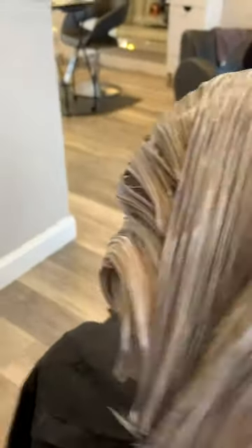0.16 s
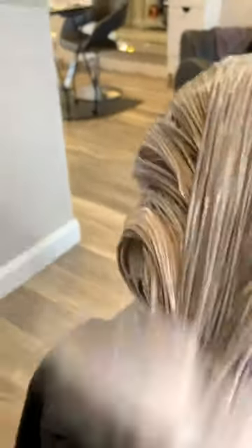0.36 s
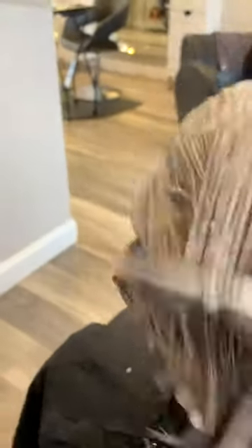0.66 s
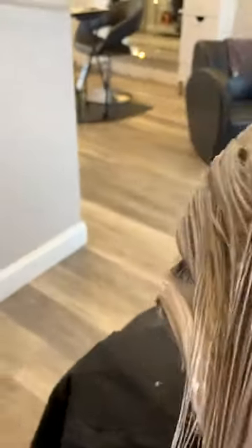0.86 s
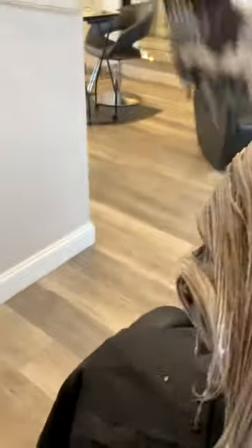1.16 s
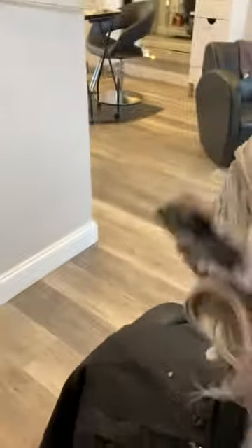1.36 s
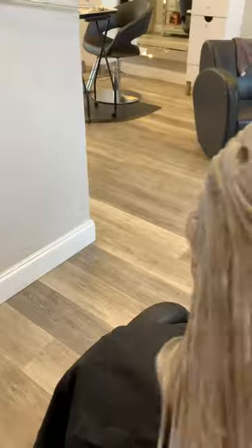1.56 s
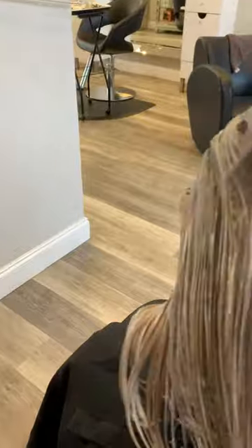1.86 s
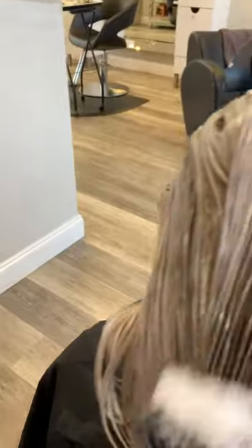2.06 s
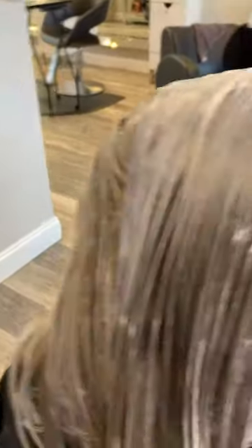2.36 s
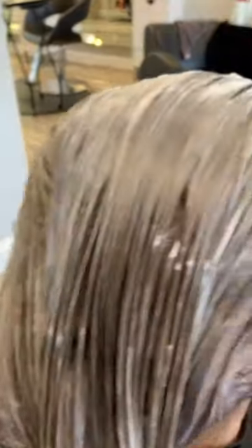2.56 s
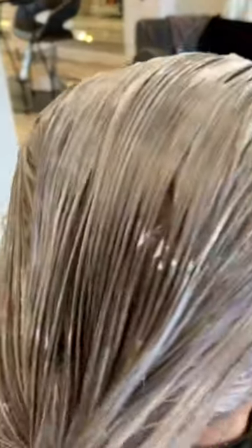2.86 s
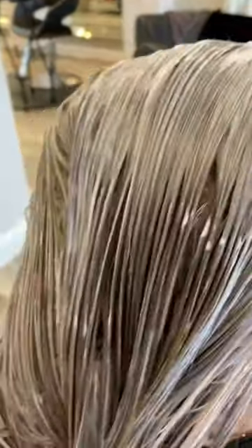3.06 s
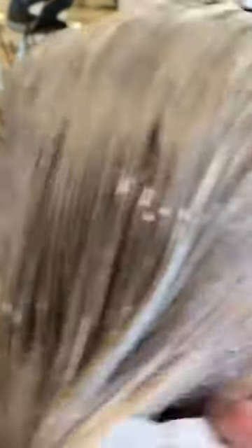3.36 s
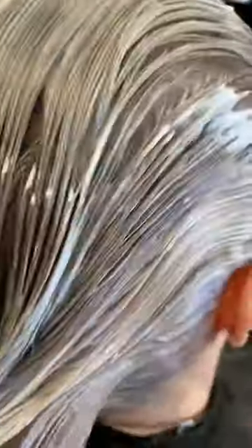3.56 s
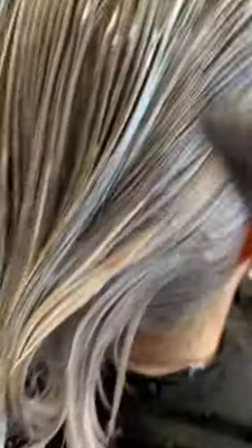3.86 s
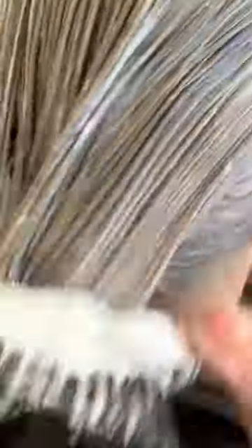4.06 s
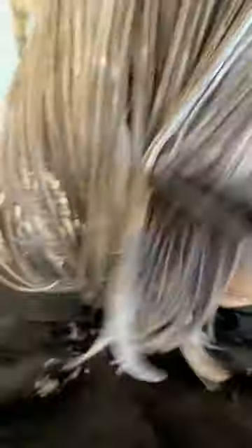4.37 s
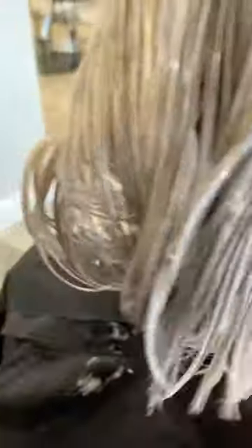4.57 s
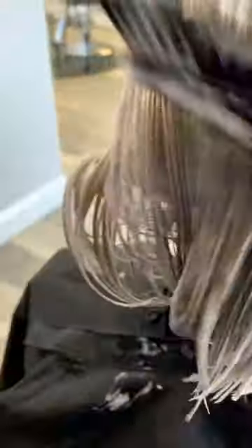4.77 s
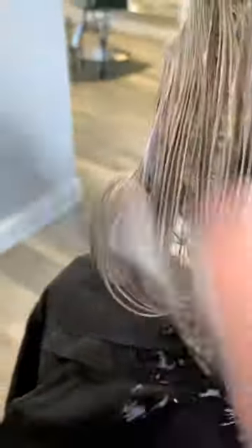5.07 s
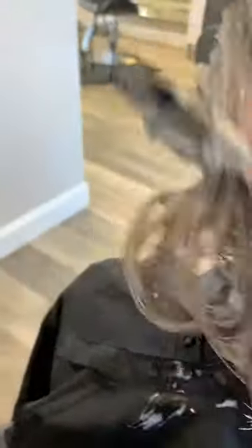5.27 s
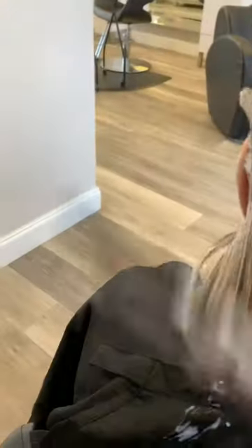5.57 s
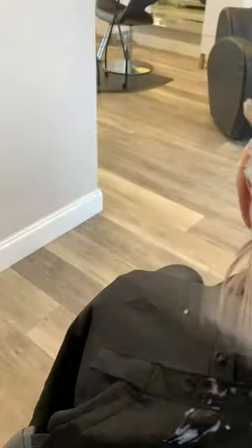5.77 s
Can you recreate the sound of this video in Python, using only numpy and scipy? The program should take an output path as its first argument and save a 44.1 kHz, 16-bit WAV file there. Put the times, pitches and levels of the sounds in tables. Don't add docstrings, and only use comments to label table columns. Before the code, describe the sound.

A brush works through wet hair right beside a phone's stereo microphone in a quiet salon. Each stroke is a dense, bright hiss of bristles with a duller scalp rasp, swelling slightly and ending quickly. Strokes land at about 0, 0.6, 1.3, 2.0, 2.6, 3.2, 3.5, 3.9, 4.4, 4.5, 4.8, 5.3 and 5.7 seconds, mostly 0.1 to 0.3 seconds long, with faint grazes trailing off the tips. Hard plastic ticks stand out near 1.1, 2.0, 2.6, 5.1 and 5.7 seconds, among fainter clicks and wet strand snaps. A small distant chair squeak comes at 0.2 seconds, soft low bumps at 0.5 to 0.8, light knocks around 2.2, and very faint cape creaks near 0.5, 2.2 and 3.8. Underneath, ventilation rumbles softly with a wavering low hum and slight puffs of air. The room adds only a short, faint tail; the stereo image shifts subtly as the brush passes.

```python
import sys
import numpy as np
from scipy import signal
from scipy.fft import rfft, irfft, next_fast_len
from scipy.io import wavfile
from scipy.ndimage import uniform_filter1d, map_coordinates

SR = 44100
rng = np.random.default_rng(int(sys.argv[2]) if len(sys.argv) > 2 else 0)


def ratio_of_db(decibels):
    return 10 ** (np.asarray(decibels, float) / 20)


def pcm_store(signal):
    levels = np.round(np.clip(np.atleast_2d(signal), -1, 1) * 32767)
    wavfile.write(sys.argv[1], SR, levels.astype(np.int16).T)


N = 261513
STEP = 20
SHARED = [
    [1],
    [0],
]


def unit(x):
    return x / np.sqrt(np.mean(x ** 2) + 1e-20)


def along(points, hz):
    f, v = np.transpose(points)
    return np.interp(np.log(hz + 1), np.log(f + 1), v)


def curves(rows, outside=None):
    s, *cols = np.transpose(rows)
    return np.array([np.interp(np.arange(N) / SR, s, c, outside, outside) for c in cols])


def slow_time():
    return np.arange(0, N + STEP, STEP) / SR


def smooth(control):
    return np.interp(np.arange(N) / STEP, np.arange(len(control)), control)


def wobble(rate_hz):
    knots = rng.standard_normal(int(N * rate_hz / SR) + 4)
    return map_coordinates(knots, [np.arange(N) * rate_hz / SR])


def filtered(x, response):
    m = next_fast_len(N + SR // 2)
    return irfft(rfft(x, m) * response(np.fft.rfftfreq(m, 1 / SR)), m)[..., :N]


def resonance(f, centre_hz, width_hz):
    return 1j * f * width_hz / (centre_hz ** 2 - f * f + 1j * f * width_hz)


def rush(spectrum, patchy_db, grain_db=0):
    z = signal.stft(rng.standard_normal((2, N)), nperseg=512)[2]
    field = uniform_filter1d(rng.standard_normal(z.shape[1:]), 6, 0)
    field = uniform_filter1d(field, 8, 1)
    pair = signal.istft(z * ratio_of_db(patchy_db * unit(field)), nperseg=512)[1][:, :N]
    pair = pair * ratio_of_db(grain_db * wobble(900))
    return unit(filtered(pair, lambda hz: ratio_of_db(along(spectrum, hz))))


def contact(start_s, end_s, start_db, end_db, fall_db_per_s):
    t = slow_time()
    landing_db = 3000 * np.maximum(start_s - t, 0)
    fall_db = fall_db_per_s * np.maximum(t - end_s, 0)
    return np.interp(t, [start_s, end_s], [start_db, end_db]) - landing_db - fall_db


def reach():
    return curves([(s, k % 2) for row in STROKES for k, s in enumerate(row[:3])])[0]


def passing(t):
    ends = []
    for k, row in enumerate(STROKES):
        ends += [(row[0], k), (row[2], k + 1)]
    return abs(np.sin(np.pi * np.interp(t, *np.transpose(ends))))


# frequency in Hz, level in dB per Hz.
RUMBLE = [(10, 1), (20, 5), (35, 6.5), (50, 2.5), (75, -8), (110, -48.5)]
DRONE = [(45, -29.5), (75, 0.5), (100, -4.5), (150, -9), (230, -9), (320, -23.5), (500, -54)]
DUCT = [(180, -5.5), (270, 1), (345, 2), (420, -4.5), (520, -15), (700, -16.5), (1000, -55)]
HUSH = [(500, -0.5), (1000, 0.5), (2200, -7.5), (2700, -5), (5000, -15.5), (8000, -27), (12500, -31),
        (15000, -27), (15700, -45)]
# frequency in Hz, level in dB.
HUM = (240, -59.5)
# time in seconds, level in dB.
FAN = [(0.0, -61), (0.08, -51), (0.54, -50), (0.63, -57), (0.66, -54), (1.55, -48.5), (2.16, -56),
       (2.82, -46.5), (3.35, -59), (3.47, -52), (4.39, -49.5), (4.44, -55), (5.1, -49.5), (5.3, -55),
       (5.33, -49), (5.93, -50)]
# peak in seconds, level in dB.
PUFFS = [(.12, -68.5), (.56, -60), (.79, -61.5), (1.09, -66), (1.75, -68), (2.21, -66.5), (2.97, -64),
         (3.52, -62), (3.86, -60.5), (4.62, -68.5), (5.19, -65.5), (5.61, -63.5), (5.93, -67)]


def ventilation():
    t = np.arange(N) / SR
    rumble_db = -58.5 + 3.5 * reach() + 2.5 * wobble(2.5)
    drone_db = -60.5 + 1.2 * wobble(6.8)
    colours = lambda hz: ratio_of_db([[along(RUMBLE, hz)], [along(DRONE, hz)]])
    rumble, drone = map(unit, filtered(rng.standard_normal((2, 2, N)), colours))
    fan_db = curves(FAN)[0] + 3.5 + 1.0 * wobble(9)
    fan = ratio_of_db(fan_db) * np.sin(2 * np.pi * 58.5 * t + 0.79 * wobble(8))
    hum_hz, hum_db = HUM
    hum = ratio_of_db(hum_db + 4.5 + 1.4 * wobble(9.2)) * np.sin(2 * np.pi * hum_hz * t + 0.25 * wobble(11))
    puff_db_per_s, duct_floor_db = 51, -73
    puffs_db = np.max([db - puff_db_per_s * abs(slow_time() - s) for s, db in PUFFS], 0)
    duct_db = smooth(puffs_db.clip(duct_floor_db))
    duct = ratio_of_db(duct_db + 2.0) * rush(DUCT, patchy_db=3.0)
    hush = ratio_of_db(-78.5 + 1.0 * wobble(13)) * rush(HUSH, patchy_db=3.0)
    turbulence = ratio_of_db(rumble_db + 6.0) * rumble + ratio_of_db(drone_db + 2.0) * drone
    return turbulence + (fan + hum) * SHARED + duct + hush


# time in seconds, frequency in Hz, level in dB, length in seconds.
THUMPS = [
    (.507, 95, -38, 0.0075),
    (0.652, 32, -38.5, 0.028),
    (0.758, 70, -41, 0.0063),
    (2.19, 351, -53, .02),
    (2.27, 339, -62.5, .04),
    (0.556, 330, -55, 0.011),
]


def thumps():
    t = slow_time()
    total = 0
    for s, hz, db, length_s in THUMPS:
        bell = np.exp(-((t - s) / length_s) ** 2)
        total = total - ratio_of_db(db) * bell * np.cos(2 * np.pi * hz * (t - s))
    return smooth(total)


# start in seconds, end in seconds, start level in dB, end level in dB.
CREAKS = [
    (0.398, 0.597, -89, -74),
    (2.2, 2.296, -82, -83),
    (3.714, 3.93, -92, -78),
]


def creak():
    rubs = ratio_of_db(1.7 * wobble(65)) * rng.standard_normal((2, N))
    cloth = unit(filtered(rubs, lambda f: resonance(f, 2170, 260) ** 2))
    level = sum(ratio_of_db(contact(*row, fall_db_per_s=150)) for row in CREAKS)
    return smooth(level) * cloth


# time in seconds, level in dB.
SQUEAK = [
    (.18, -92),
    (.19, -49.5),
    (.26, -62),
    (.4, -76.5),
    (.415, -90),
    (.435, -76),
    (.5, -91),
]


def squeak():
    slip_rate_hz = 125 * ratio_of_db(.7 * wobble(30))
    slips = np.diff(np.floor(np.cumsum(slip_rate_hz / SR)), prepend=0) * ratio_of_db(1.5 * wobble(100))
    steel = unit(filtered(slips, lambda f: resonance(f, 3170, 130) ** 2))
    tone = ratio_of_db(curves(SQUEAK, outside=-150)[0]) * steel
    return np.array([tone, np.roll(tone, 4)])


# frequency in Hz, t60 in seconds.
WALLS = [(300, 0.26), (2000, 0.12), (10000, 0.041)]


def walls(x):
    hz, t, z = signal.stft(rng.standard_normal((2, SR // 2)), SR, nperseg=256)
    decay = ratio_of_db(-60 * t / along(WALLS, hz)[:, None])
    tail = signal.istft(z * decay, SR, nperseg=256)[1]
    delayed = np.pad(x, (150, 0))[None]
    return signal.fftconvolve(delayed, tail / np.linalg.norm(tail[0]), axes=1)[:, :N]


# time in seconds, peak in dB, knock in dB re peak.
TICKS = [(0.4356, -70, -14), (0.6005, -55, -18), (0.9469, -50, -22), (1.002, -60, 3), (1.0872, -31, 0),
         (1.2627, -65, -13), (1.861, -66, -6), (1.876, -63, -20), (1.9484, -53, -18), (1.9696, -46, -2),
         (2.044, -31, -12), (2.5738, -33, -16), (2.6175, -30, -21), (3.1023, -55, -27), (3.2256, -56, -19),
         (3.8862, -73, -12), (3.8955, -60, -15), (3.9376, -42, -1), (4.2076, -46, -32), (4.3821, -51, -10),
         (4.799, -59, -9), (5.1016, -63, 2), (5.1241, -25, -10), (5.23, -52, -18), (5.384, -45, 3),
         (5.5634, -65, -22), (5.7393, -27.5, -10)]
# time in seconds, peak in dB.
FAINT_TICKS = [(.47, -74), (1.0384, -71), (1.1937, -73), (2.3394, -80), (2.36, -78), (2.4137, -82), (3.2035, -78),
               (4.2874, -79), (4.6164, -72), (4.7194, -74), (5.5544, -80)]
# frequency in Hz, width in Hz, level in dB.
BODY = [(550, 180, -9.5), (2070, 320, -1), (4400, 910, -2.5)]


def ticks():
    cracks, blows, t = np.zeros(N + SR), np.zeros(N), np.arange(600) / SR
    snap_knock_db = -2
    for s, db, knock_db in TICKS + [(s, db, snap_knock_db) for s, db in FAINT_TICKS]:
        at = round((s + 0.00074) * SR)
        crackle = ratio_of_db(0.76 * db - 12.5 - 60 * t / 0.0036) * rng.standard_normal(len(t))
        cracks[at:][:len(t)] += crackle
        cracks[at] += ratio_of_db(0.86 * db + 4)
        blows[at] = ratio_of_db(db + knock_db + 25.5)

    def back(f):
        return sum((-1) ** k * ratio_of_db(db) * resonance(f, hz, width) for k, (hz, width, db) in enumerate(BODY))

    def pins(f):
        return (1j * f / (2500 + 1j * f)) ** 2 * (1 + 1.5 * resonance(f, 6800, 3000))

    return filtered(np.array([cracks[:N], blows]), lambda f: np.array([pins(f), back(f)])).sum(0)


# frequency in Hz, lead in radians.
NEAR_LEAD = [(300, 0), (1800, .2), (3600, 1.1), (5100, 3.14), (8000, 6.28), (12200, 9.42), (15600, 12.5)]
FAR_LEAD = [(60, 0), (350, -.5), (750, -2.6), (1500, -.6), (2500, -2.8), (3600, -1.5), (5100, -3.14),
            (8000, 0), (12200, 3.14), (15600, 6.28)]
# frequency in Hz, likeness 0-1.
NEAR_ALIKE = [(500, 0.051), (1000, 0.41), (1800, 0.67), (2400, .75), (3000, 0.82), (4200, 0.76),
              (5200, 0.77), (8000, 0.9), (15000, 1)]
FAR_ALIKE = [(40, .999), (110, 0.97), (200, 0.55), (380, 0.12), (700, 0.56), (1500, 0.44), (2500, 0.68),
             (5000, 0.67), (15000, .93)]


def ports(pair, alike, lead):
    m = next_fast_len(N + SR // 2)
    hz = np.fft.rfftfreq(m, 1 / SR)
    turn = np.arccos(np.clip(along(alike, hz), 0, 1)) / 2
    both, apart = rfft(pair, m) * [np.cos(turn), np.sin(turn)]
    half_lead = np.exp(.5j * np.interp(hz, *np.transpose(lead)))
    return irfft([(both + apart) * half_lead, (both - apart) / half_lead], m)[:, :N]


def shoulder_echo(x, width_hz):
    hz, t, z = signal.stft(x, SR, nperseg=1024)
    pull = passing(t)
    fullest_s = [row[1] for row in STROKES]
    centre_hz, strength = (np.interp(t, fullest_s, c) for c in np.transpose(HOLD)[-2:])
    centre_hz = centre_hz + 330 * pull
    band = np.exp(-((hz[:, None] - centre_hz) / width_hz) ** 4)
    lag_swing = .025 * np.outer(np.interp(hz, *np.transpose(NEAR_LEAD)), .45 - pull)
    half_lead = np.exp(1.2j * strength * band + .5j * lag_swing)
    return signal.istft([z[0] * half_lead, z[1] / half_lead], SR, nperseg=1024)[1][:, :N]


# landing, fullest pull and lift in seconds, landing level and fullest level in dB.
STROKES = [(0.0, 0.158, 0.2, -52.5, -50.5), (.602, 0.765, .825, -51, -48),
           (1.31, 1.47, 1.617, -57.5, -50.5), (1.967, 2.115, 2.175, -53.5, -47.5),
           (2.611, 2.87, 2.932, -51, -51), (3.225, 3.278, 3.376, -55.5, -54),
           (3.514, 3.585, 3.608, -56, -48.5), (3.937, 4.03, 4.162, -52, -46),
           (4.385, 4.414, 4.459, -62, -47.5), (4.461, 4.538, 4.552, -54, -51.5),
           (4.797, 4.91, 4.958, -54.5, -48.5), (5.275, 5.363, 5.468, -51, -48),
           (5.692, 5.74, 5.845, -54, -48.5)]
# scalp rasp at landing and at the fullest in dB re hiss,
# shoulder echo band in Hz, echo strength 0-1.
HOLD = [(-13, -11, 2800, .9), (-1.5, -6.5, 2750, .8), (-5.5, -5.5, 2800, 0.77), (-10.5, -5, 2650, .85),
        (-13.5, -7.5, 2750, .8), (-16.5, -12.5, 2680, 0.92), (3.5, -6, 2630, .7), (-9, -7.5, 2700, 0.64),
        (-6, -8, 2840, 0.63), (-7.5, -9.5, 2950, .6), (2.5, -6.5, 2740, .75), (-5, -5.5, 2650, .9),
        (-5, -7, 2700, .8)]
# start in seconds, end in seconds,
# start level in dB, end level in dB.
GRAZES = [(0.19, .255, -64, -86), (.812, .87, -53, -60), (.87, .94, -64, -79), (0.94, 0.993, -76, -66),
          (1.104, 1.141, -73, -67.5), (1.263, 1.307, -77, -57.5), (1.628, 1.69, -68, -88),
          (1.946, 1.96, -71, -73), (2.174, 2.26, -53.5, -66.5), (2.573, 2.592, -55.5, -65),
          (2.591, 2.612, -63, -57), (2.943, 3.002, -73.5, -87), (3.324, 3.52, -57.5, -56.5),
          (3.62, 3.666, -68.5, -64), (4.175, 4.224, -61, -74), (4.556, 4.615, -63, -86),
          (4.955, 4.995, -55, -72.5), (5.0, 5.04, -75, -86), (5.095, 5.12, -76, -80),
          (5.127, 5.129, -48, -62), (5.136, 5.19, -82, -78), (5.228, 5.276, -74, -49),
          (5.472, 5.51, -75, -74.5), (5.68, 5.698, -66, -64), (5.85, 5.855, -66, -77),
          (5.866, 5.876, -61, -56.5), (5.886, 5.933, -74, -84)]
# frequency in Hz, level in dB per Hz.
BRISTLES = [(900, -32.5), (2000, -17.5), (3500, -2), (6000, 3), (9000, 0.5), (12000, -1), (15500, -3),
            (18000, -8)]
SCALP = [(400, -17.5), (800, -15.5), (1200, -8), (1700, 0.5), (2400, -3.5), (3300, -0.5), (5000, -50.5)]


def strokes():
    ease_db, tips_db, graze_rasp_db = 5.5, 4, -4.5
    lift_db_per_s, trail_db_per_s = 1202, 596.5
    t, hiss_db, rasp_db = slow_time(), -150, -150
    for (land, full, lift, land_db, full_db), hold in zip(STROKES, HOLD):
        easing = np.clip((t - full) / (lift - full), 0, 1) ** 2
        db = contact(land, full, land_db, full_db, fall_db_per_s=0)
        db = db - ease_db * easing - lift_db_per_s * np.maximum(t - lift, 0)
        scalp_db = np.interp(t, [land, full], hold[:-2]) - tips_db * easing
        hiss_db = np.maximum(hiss_db, db)
        rasp_db = np.maximum(rasp_db, db + scalp_db)
    for row in GRAZES:
        db = contact(*row, trail_db_per_s)
        hiss_db = np.maximum(hiss_db, db)
        rasp_db = np.maximum(rasp_db, db + graze_rasp_db)
    snag = ratio_of_db(0.58 * wobble(40))
    bright = smooth(ratio_of_db(5.0 + hiss_db)) * rush(BRISTLES, patchy_db=2.0, grain_db=0.5)
    dull = smooth(ratio_of_db(3.0 + rasp_db)) * rush(SCALP, patchy_db=3.5, grain_db=1.0)
    snaps = ratio_of_db(9.5 + 3.7 * rng.standard_normal(N)) * (rng.random(N) < 60 / SR)
    bright *= 1 + uniform_filter1d(snaps, 24) * 5
    return snag * (bright + dull)


def scene():
    hits, hair = ticks(), strokes()
    room = walls(ratio_of_db(-12.5) * hits + ratio_of_db(-22.5) * hair[0])
    far = thumps() * SHARED + ventilation() + creak() + room
    near = shoulder_echo(ports(hair + hits * SHARED, NEAR_ALIKE, NEAR_LEAD), width_hz=678)
    return near + ports(far, FAR_ALIKE, FAR_LEAD) + squeak()


def joint_stereo(x, under_db, width_hz, jump_db):
    hz, t, z = signal.stft([x[0] + x[1], x[0] - x[1]], SR, nperseg=2048)
    band = (hz / width_hz).astype(int)
    edges = np.flatnonzero(np.diff(band, prepend=-1))
    level = np.sqrt(np.add.reduceat(abs(z) ** 2, edges, axis=1))
    treble = np.sqrt(abs(uniform_filter1d(np.diff(x[0], 2, prepend=[0, 0]) ** 2, 128)))
    rising = treble > ratio_of_db(jump_db) * np.roll(treble, 256)
    frame_at = np.minimum(t * SR, N - 1).astype(int)
    attack = uniform_filter1d(1. * rising, 1700)[frame_at] > 1e-3
    keep = (level > ratio_of_db(under_db) * level[::-1])[:, band] | (hz < 600)[:, None]
    keep = keep & (hz < 15900)[:, None] | attack
    mid, side = signal.istft(z * keep, SR, nperseg=2048)[1][:, :N] / 2
    return np.array([mid + side, mid - side])


def low_pass(x):
    return signal.sosfilt(signal.butter(12, 16990, fs=SR, output="sos"), x)


def record(dry):
    edge_hz, edge_db = [15900, 16020, 15940, 16600], [-0.5, -5, -18, -87]
    limited = filtered(dry, lambda hz: ratio_of_db(np.interp(hz, edge_hz, edge_db)))
    mix = joint_stereo(limited, under_db=-6.5, width_hz=340, jump_db=9.5)
    return low_pass(mix)


dry = scene()
out = record(dry)
pcm_store(out)
```